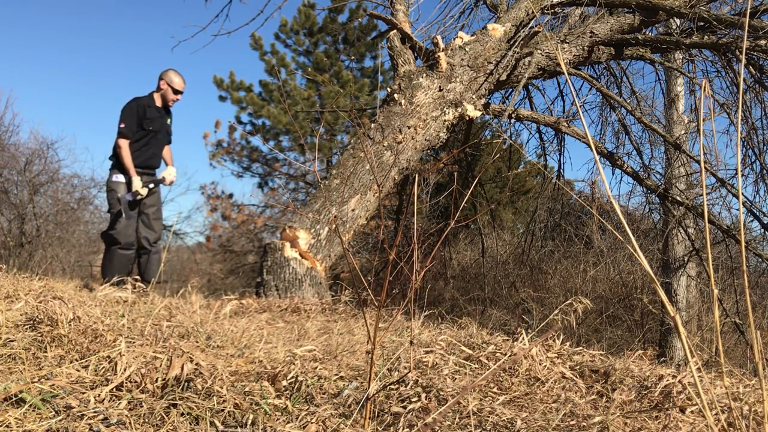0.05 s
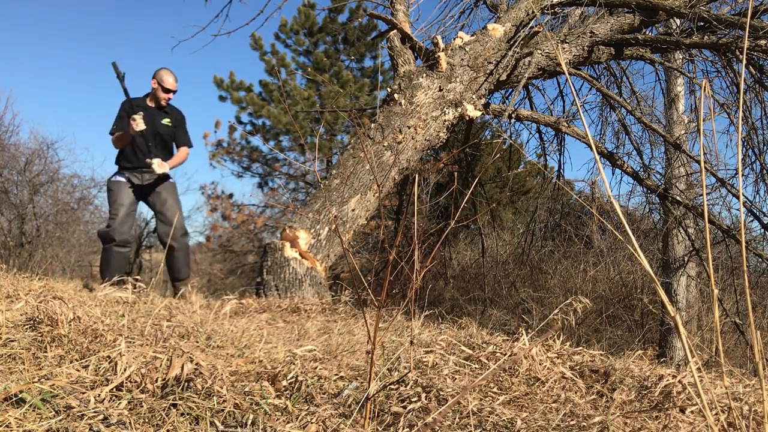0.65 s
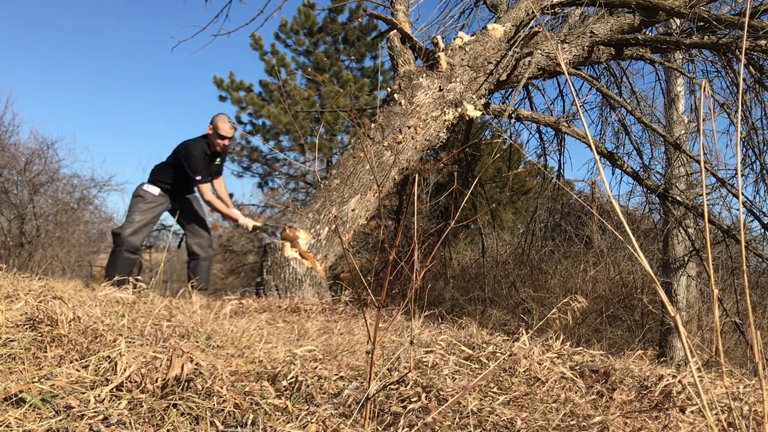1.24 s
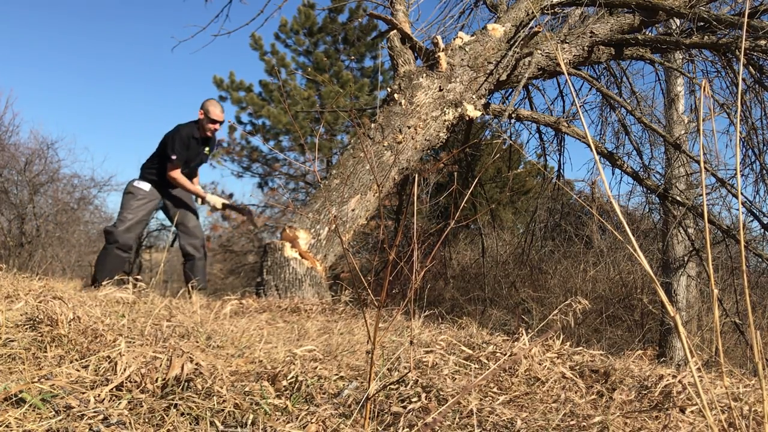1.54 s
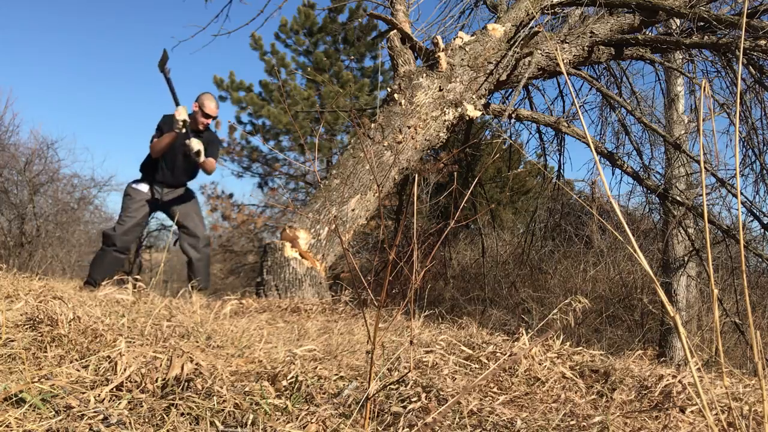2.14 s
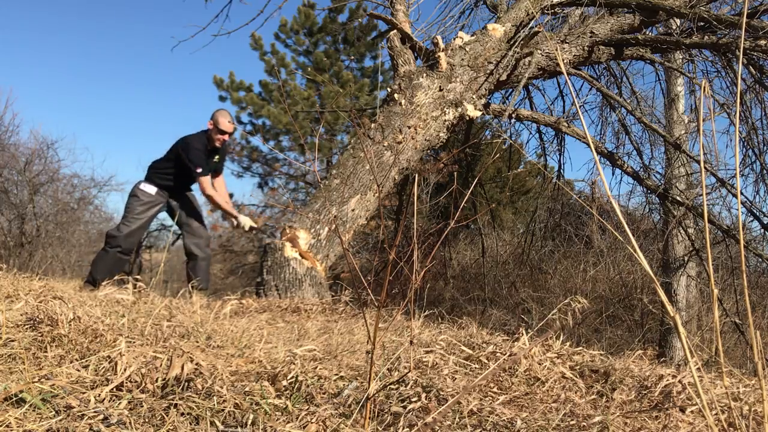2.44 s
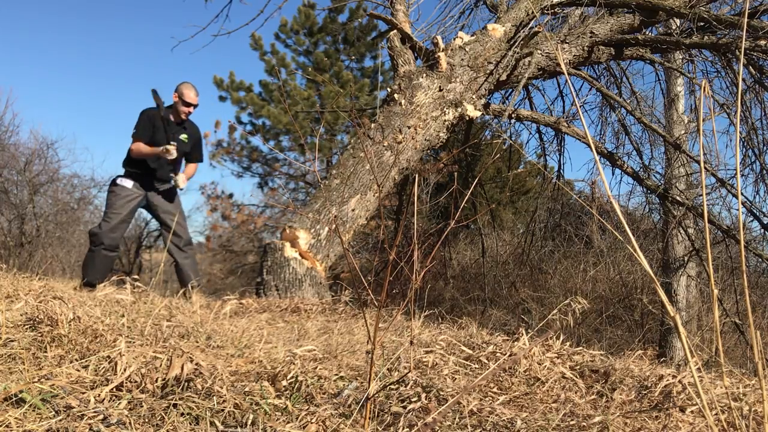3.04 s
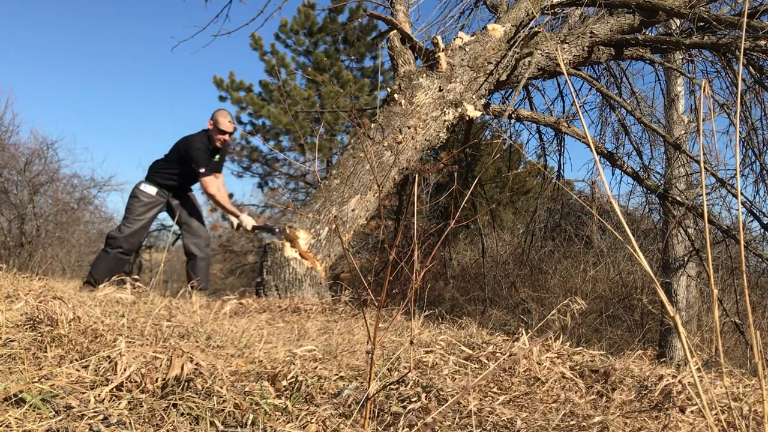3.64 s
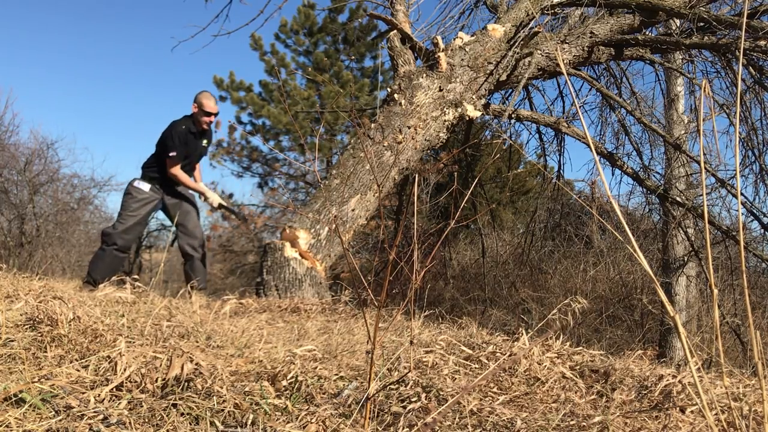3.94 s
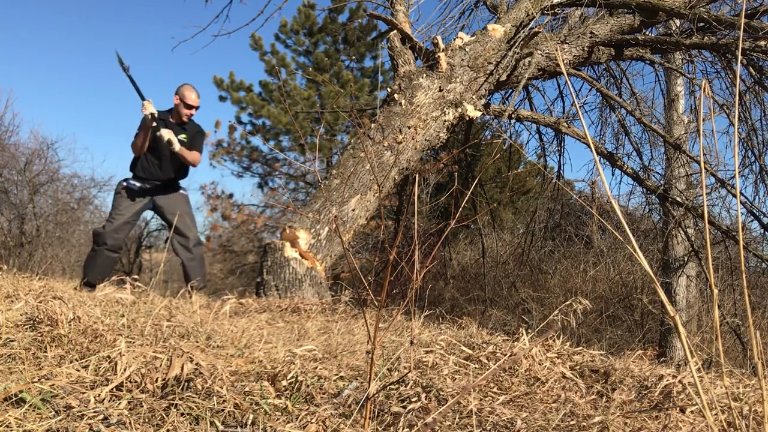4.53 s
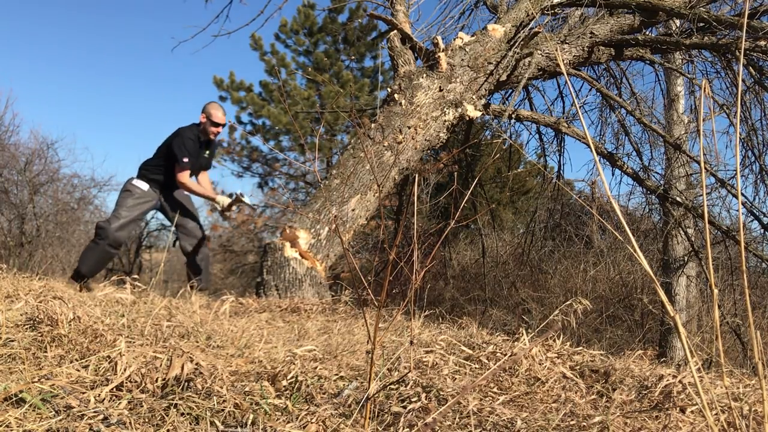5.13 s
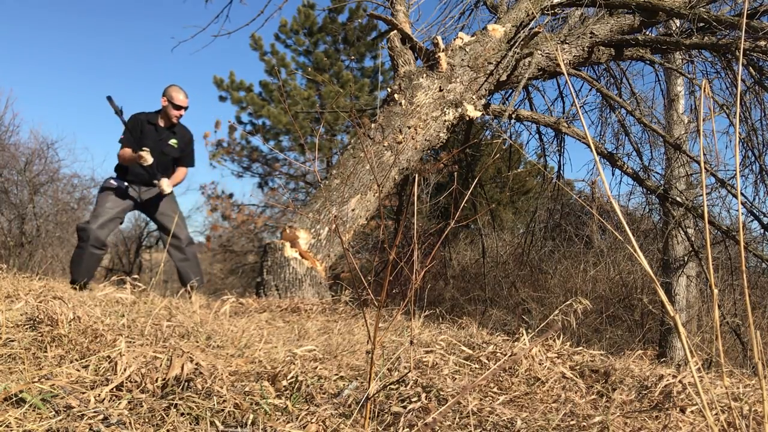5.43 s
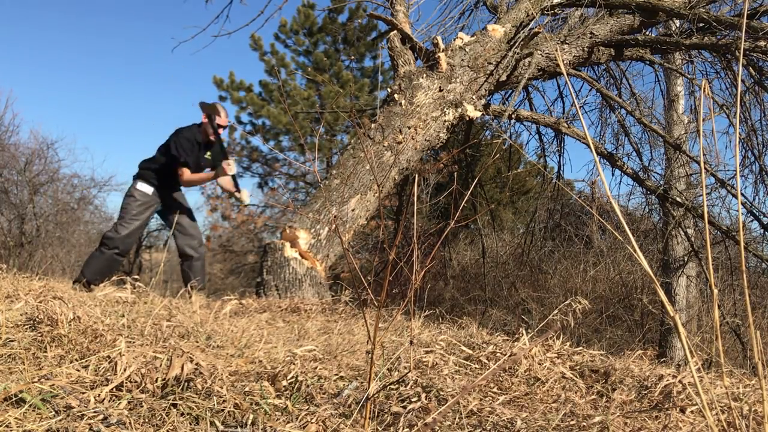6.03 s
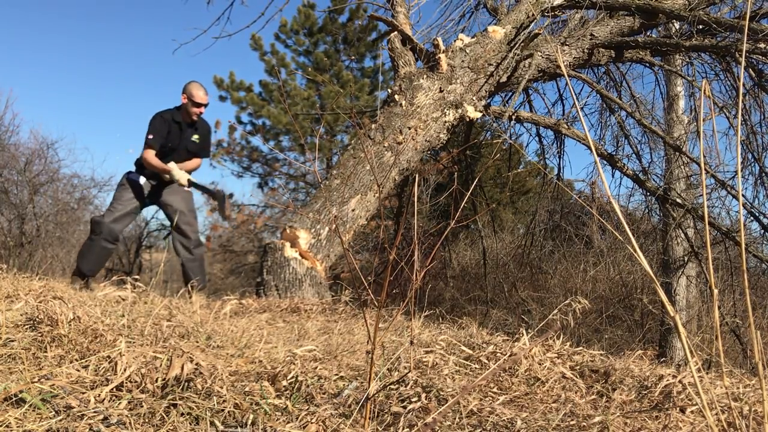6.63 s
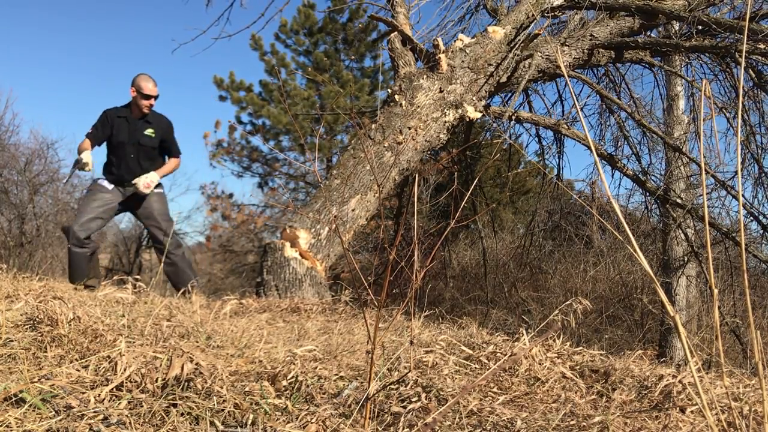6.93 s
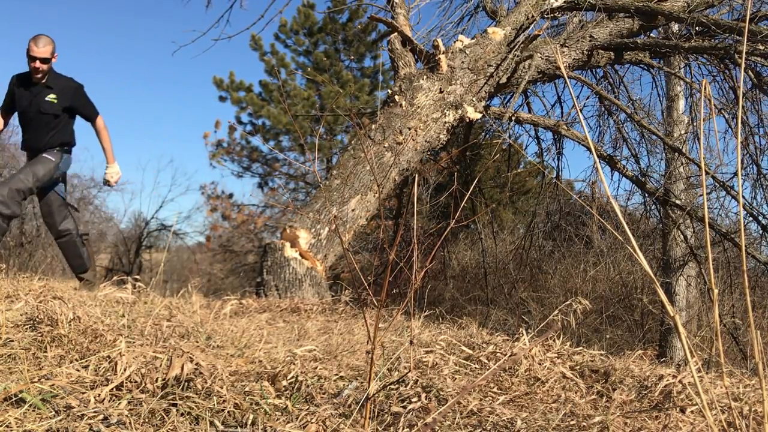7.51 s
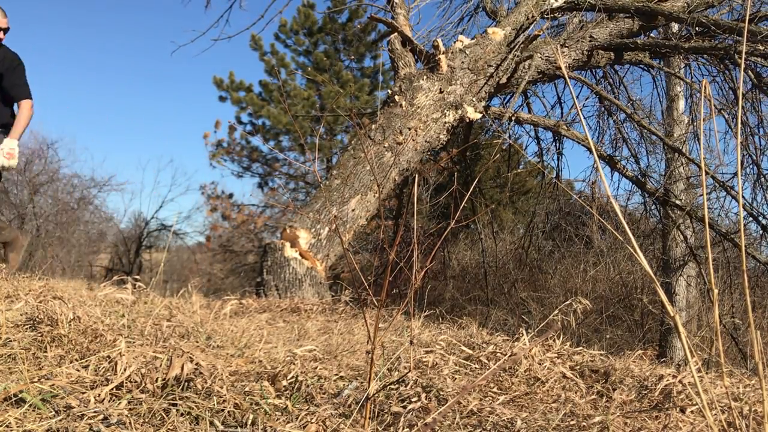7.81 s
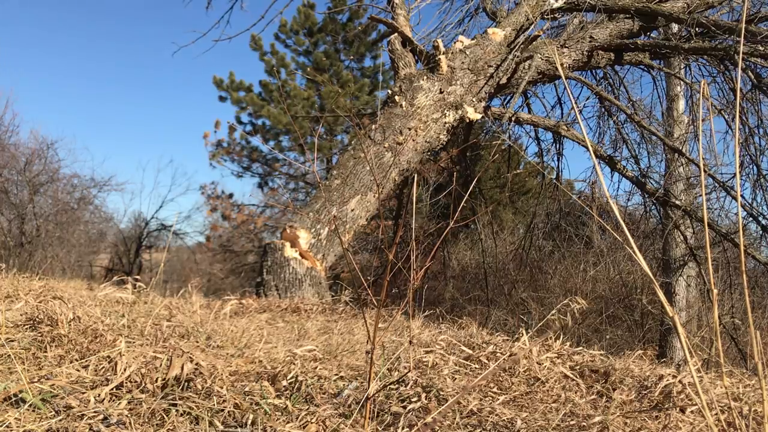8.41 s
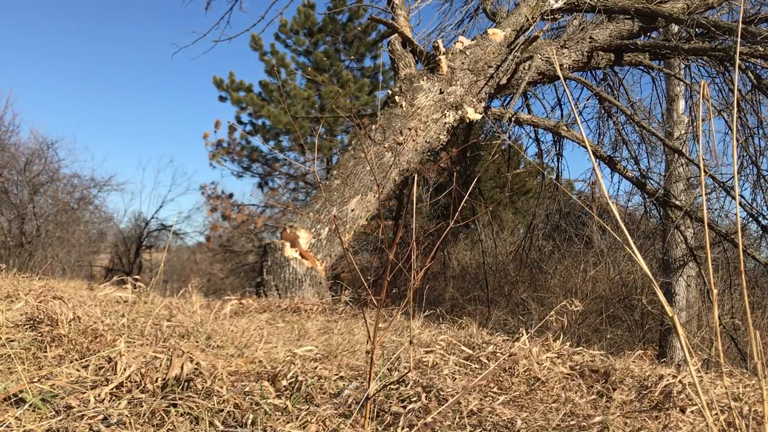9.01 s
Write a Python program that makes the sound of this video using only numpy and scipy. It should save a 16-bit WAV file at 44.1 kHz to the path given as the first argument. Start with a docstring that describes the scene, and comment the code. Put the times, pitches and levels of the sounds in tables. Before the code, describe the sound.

At the edge of a quiet field, an axe chops into a tree five times, a little over a second apart. Each blow is a sharp crack over a woody knock, with a short echo from nearby trees. Wood fibres snap between the later blows. Then much softer footsteps move through dry grass, breaking twigs. Faint, distant traffic rumbles underneath.

```python
"""At the edge of a dry field, an axe bites five times into the base of a leaning tree.
Each blow is a short crack of tearing fibres over the knock and thud of the trunk, thrown back by the
wood behind; strained fibres snap at the cut. Then the chopper walks off through dead grass, boots
puffing on the turf and breaking twigs. Far traffic rumbles underneath, and a faint bird calls once."""
import sys
import numpy as np
from scipy import signal
from scipy.io import wavfile
from scipy.ndimage import uniform_filter1d

SR = 44100
rng = np.random.default_rng(int(sys.argv[2]) if len(sys.argv) > 2 else 0)


def wrap_up_sound(samples):
    """Save the sound to the file named by the first command line argument, as 16-bit audio."""
    columns = np.atleast_2d(samples).T
    # keep every value between -1 and 1, then stretch to whole-number steps
    tamed = np.clip(columns, -1, 1)
    steps = np.round(tamed * 32767).astype(np.int16)
    wavfile.write(sys.argv[1], SR, steps)


N = 408366


def amp(db):
    return 10 ** (np.asarray(db) / 20)


def unit(x):
    """Scales to rms 1."""
    return x / np.sqrt(np.mean(x ** 2) + 1e-20)


def burst(x, db):
    """Gives a transient the energy of 5 ms at this level."""
    return x * amp(db) * np.sqrt(.005 * SR / np.sum(x ** 2))


def curve_at(points, hz):
    """Reads a breakpoint curve on a log-frequency axis."""
    f, value = np.transpose(points)
    return np.interp(np.log(hz + 1), np.log(f), value)


def add(mix, s, sound):
    """Lays a sound into the mix at s seconds."""
    part = mix[round(s * SR):][:len(sound)]
    part += sound[:len(part)]


def eq(x, points, size=4096):
    """Minimum-phase EQ through breakpoints of f/Hz, level/dB."""
    log_gain = np.log(amp(curve_at(points, abs(np.fft.fftfreq(size, 1 / SR)))))
    taps = np.fft.ifft(np.exp(np.conj(signal.hilbert(log_gain)))).real
    return signal.fftconvolve(x, taps[:size // 2])[:len(x)]


# fader ride on the far traffic: t/s, level/dB
TRAFFIC_FADER = [(0, -59.5), (1.4, -56), (3.1, -59), (7.9, -57.5), (8.4, -56), (9.26, -55)]
# tone of the traffic rumble and of the open air: f/Hz, level/dB
TRAFFIC_EQ = [(20, -38), (36, -18), (52, 3), (72, -5), (100, -3.5), (160, -10.5), (250, -17.5), (400, -27),
              (750, -34.5), (3000, -69.5)]
AIR_EQ = [(100, -5), (400, -3.5), (750, -3.5), (1200, 0.5), (1900, -4), (3200, -10.5), (7000, -15.5),
          (16000, -20)]
def traffic_and_air():
    """The bed: far traffic rumbles, gently swelling and easing, under a steady wash of air."""
    fader = amp(np.interp(np.arange(N) / SR, *np.transpose(TRAFFIC_FADER)))
    rumble = fader * unit(eq(rng.standard_normal(N), TRAFFIC_EQ, size=16384))
    return rumble + amp(-71) * unit(eq(rng.standard_normal(N), AIR_EQ))


def stalks(per_s, spread_db):
    """Dry stalks tick at random on a spread of pitches, each ringing for a few cycles."""
    out, t = np.zeros(N), np.arange(256) / SR
    pitches = np.linspace(1800, 15500, num=22)
    for hz in pitches:
        at = np.flatnonzero(rng.random(N) < per_s / len(pitches) / SR)
        clicks = np.zeros(N)
        clicks[at] = rng.choice([-1., 1.], len(at))
        clicks[at] *= amp(spread_db * np.minimum(rng.exponential(1, len(at)), 4.5))
        out += signal.oaconvolve(clicks, np.sin(2 * np.pi * hz * t) * np.exp(-t / .0003))[:N]
    return unit(out)


def blade_flicks(per_s, spread_db):
    """Lone blades flick: tiny broadband clicks with a few ms of flutter."""
    t = np.arange(SR // 50) / SR
    flicks = (rng.random(N) < per_s / SR) * amp(spread_db * rng.standard_normal(N))
    return signal.oaconvolve(flicks, np.exp(-t / .0025))[:N] * rng.standard_normal(N)


# leg swishes through the grass: peak t/s, 10 dB rise/s, 10 dB fall/s, level/dB, stems re swish/dB
SWISHES = [(.67, .13, 0.29, -67, -16), (.90, 0.16, 0.071, -60.5, -17), (1.14, 0.063, 0.097, -68, -14),
           (1.255, 0.13, 0.1, -60, -20.5), (1.64, 0.046, 0.051, -60, -18), (1.779, 0.13, 0.52, -67.5, -6),
           (2.12, .05, .1, -77, -14), (2.91, 0.085, 0.21, -71, -8), (3.22, 0.11, .12, -74.5, -14),
           (4.29, 0.083, 0.098, -73, -14), (5.01, 0.096, .06, -69, -12.5), (5.335, .1, 0.057, -53.5, -19),
           (6.701, 0.3, .15, -61, -12), (6.95, 0.13, 0.13, -56, -9), (7.242, .15, 0.15, -54.5, -12),
           (7.38, 0.1, 0.053, -63.5, 4), (7.715, 0.05, 0.054, -49.5, -9), (7.865, 0.064, 0.061, -52, -11),
           (7.999, 0.026, 0.085, -59, -6), (8.272, .015, 0.13, -51.5, -27),
           (8.56, 0.059, 0.066, -60.5, -18), (8.99, 0.093, 0.1, -53, -26), (8.925, 0.022, 0.08, -64, -20.5),
           (9.08, .03, .04, -61.5, -9.5), (9.23, 0.07, .1, -68, -7.5)]
# tone of dry blades, stiff stems and crunching turf: f/Hz, level/dB
GRASS_EQ = [(300, -12), (900, -3), (2000, -6.5), (3800, 0), (6000, 0.5), (9000, -0.5), (11000, -2.5),
            (13500, 0.5), (16000, -6.5)]
STEM_EQ = [(1500, -21.5), (3000, 1), (4200, 1.5), (7000, -7.5), (10000, -10.5), (16000, -21.5)]
TURF_EQ = [(40, -5.5), (90, 3), (280, 3.5), (600, -6.5), (1200, -15.5), (3000, -25)]
def grass(walk_s=6.6, idle_db=-83.5, litter_db=-67.5):
    """Legs brush blades and crackle stems, turf crunches on the walk, litter sifts after each blow."""
    t = np.arange(N) / SR
    clumps = amp(.9 * unit(uniform_filter1d(rng.standard_normal(N), size=600)))
    swish_power, stem_power = np.zeros(N), np.zeros(N)
    for s, rise_s, fall_s, db, stems_db in SWISHES:
        power = amp(db - 10 * np.maximum((s - t) / rise_s, (t - s) / fall_s)) ** 2
        swish_power += power
        stem_power += power * amp(stems_db) ** 2
    litter = sum(np.interp(t - s, [0, .05, .396, .456], [0, 1, 1, 0]) for s, *_ in AXE_HITS)
    stir = np.sqrt(swish_power + amp(idle_db) ** 2 + (amp(litter_db) * litter) ** 2)
    walking = np.clip((t - walk_s) / .3, 0, 1)
    grit = .5 + .3 * walking  # balance of stalk ticks to smooth hiss
    rustle = (grit * stalks(per_s=1800, spread_db=4.1) + rng.standard_normal(N)) / np.hypot(grit, 1)
    blades = stir * unit(eq(rustle * clumps, GRASS_EQ))
    flicks = unit(eq(blade_flicks(per_s=19, spread_db=3), GRASS_EQ))
    flicks *= amp(-83 + 8.7 * walking) * (t > .5)
    stems = np.sqrt(stem_power) * unit(eq(stalks(per_s=1400, spread_db=3.6), STEM_EQ))
    turf = unit(eq(rng.standard_normal(N) * clumps, TURF_EQ))
    turf *= walking * (amp(-76) + amp(-10) * stir)
    return blades + flicks + stems + turf


# tone of tearing wood: f/Hz, level/dB
TEAR_EQ = [(150, -27.5), (500, -16.5), (1000, -12.5), (1400, -8.5), (1800, -4.5), (2300, -5), (2800, -1.5),
           (3500, -1), (4700, -8), (6000, -6), (7800, -12), (10500, -17.5), (13000, -18), (16000, -24)]
def tear(t, bite_ms, mid_db, top_db, fall_s, scatter_db, scatter_s):
    """Fibres part in a dense volley while the bite lasts; bark and ground scatter a short tail."""
    bite_s = bite_ms / 1000
    after = np.maximum(t - bite_s, 0)
    attack = np.minimum(.31 + t / bite_s, 1)
    release = np.exp(-after / fall_s) + amp(scatter_db) * np.exp(-after / scatter_s)
    volley = attack * release * rng.choice([-1., 1.], len(t))
    tilt = [(1500, mid_db), (2800, 0), (3800, 0), (7500, top_db)]
    return eq(volley, [(hz, db + curve_at(tilt, hz)) for hz, db in TEAR_EQ])


# twigs underfoot: t/s, level/dB, mids/dB, top/dB
TWIG_BREAKS = [(0.8763, -53, 17, 12.5), (3.963, -56.5, -3, 19), (4.4948, -59.5, -1.5, 14.5),
               (6.7165, -49.5, 2, 8.5), (6.7706, -46.5, -2, 10.5), (6.8308, -47, -13, 4.5),
               (6.932, -44.5, 18, 14.5), (6.9908, -48.5, -9, 21.5), (7.0902, -40.5, 0.5, 9),
               (7.115, -42, -4, 3), (7.2461, -44.5, -3, 3), (7.582, -56, -11, 11), (7.625, -54, -14, 9),
               (7.711, -38.5, -0.5, 12.5), (7.8247, -52.5, -6, 1), (7.9947, -53.5, -10, -8),
               (8.1954, -52, 7, 5), (8.8998, -54, -8, 22), (9.172, -60, -3, 3)]
def twigs(bite_ms=2.02):
    """Thin dry sticks break with a short tear and no knock."""
    out, t = np.zeros(N), np.arange(SR // 6) / SR
    for s, db, mid_db, top_db in TWIG_BREAKS:
        crack = tear(t, bite_ms, mid_db, top_db, fall_s=.0005, scatter_db=-9, scatter_s=.012)
        add(out, s, burst(crack, db))
    return out


# axe hits: t/s, crack level/dB, bite/ms, mids/dB, top/dB, cut f/Hz, cut ring/dB, buzz/dB,
# splinter f/Hz, splinter ring/dB, knock/dB, trunk tuning/ratio, bark/dB, thud/dB,
# slab f/Hz, slab ring/dB; rings and buzz are relative to the crack
AXE_HITS = [(1.3390, -11.5, 2.9, -1.5, -7, 2830, -6.5, -31, 1865, -14, 0.5, 0.94, -27.5, 0.5, 1230, -20),
            (2.5344, -13.5, 3.0, -2.5, 6, 3730, -11.5, -36.5, 5480, -6.5, -9, .75, -30.5, -2.5, 1957, -10.5),
            (3.7522, -14, 3.46, 7, 0.5, 3326, -11, -29, 4190, -8, 1.5, 1.08, -28.5, -0.5, 1600, -9),
            (5.0428, -17.5, 2.4, 3.5, -1.5, 3280, -7, -22, 6100, -9.5, 2, 1.05, -32.5, 0, 1643, -10.5),
            (6.2560, -13.5, 4.15, -2, 0.5, 2678, -7, -33, 3403, -7.5, -1, 0.9, -23, -11, 950, -17)]
# modes of the trunk's knock and the roots' thud, before tuning: f/Hz, level/dB, T60/s
TRUNK_MODES = [(174, -26.5, 0.066), (245, -25.5, 0.052), (370.1, -24, .055), (425, -22.5, 0.053),
               (566, -21, .022), (836, -47, 0.13), (1050, -30.5, .02)]
ROOT_MODES = [(56, -42, 0.26), (90.45, -25.5, .14), (118, -33, .09)]
# tone of loose bark rattling: f/Hz, level/dB
BARK_EQ = [(25, -35), (60, -15.5), (130, -1.5), (230, -2), (400, -7), (600, -12), (1000, -12.5),
           (2000, -27), (6000, -50.5)]
def axe():
    """Each blow tears the cut, rings splinter and slab, knocks the trunk and shakes bark and roots."""
    out, t = np.zeros(N), np.arange(SR // 3) / SR
    tremble_filter = signal.butter(2, 170, fs=SR, output="sos")
    for (s, db, bite_ms, mid_db, top_db, cut_hz, cut_db, buzz_db, splinter_hz, splinter_db,
         knock_db, tuning, bark_db, thud_db, slab_hz, slab_db) in AXE_HITS:
        crack = tear(t, bite_ms, mid_db, top_db, fall_s=.0008, scatter_db=-16, scatter_s=.012)
        add(out, s, burst(crack, db))
        strain = np.minimum(t * 1000 / bite_ms, 1) ** 2
        rings = [(cut_hz, cut_db, .0019), (splinter_hz, splinter_db, .0014), (slab_hz, slab_db, .0012)]
        for hz, ring_db, decay_s in rings:
            ping = np.sin(2 * np.pi * hz * t) * strain * np.exp(-t / decay_s)
            add(out, s, burst(ping, db + ring_db))
        tremble = signal.sosfilt(tremble_filter, rng.standard_normal(len(t)))  # loose fibres
        buzz = np.sin(2 * np.pi * cut_hz * t) * strain * tremble * np.exp(-t / .055)
        add(out, s, burst(buzz, db + buzz_db))
        wedge = tear(t, 2.7, mid_db, top_db, fall_s=.00062, scatter_db=-22, scatter_s=.0054)
        add(out, s + .0052, burst(wedge, db - 11))  # the head jams in the cut
        add(out, s + .0011, amp(knock_db) * ring(TRUNK_MODES, t, tuning, rise_cycles=.36))
        bark = eq(rng.standard_normal(len(t)) * np.exp(-t / .018), BARK_EQ)
        add(out, s + .004, burst(bark, bark_db))
        add(out, s + .003, amp(thud_db) * ring(ROOT_MODES, t, tuning=.97, rise_cycles=.65))
    return out


def ring(modes, t, tuning, rise_cycles):
    """The tree's body: bending waves are slow in the bass, so low modes bloom later."""
    out = np.zeros(len(t))
    for k, (hz, db, t60) in enumerate(modes):
        envelope = (1 - np.exp(-t * hz / rise_cycles)) * amp(db - 60 * t / t60)
        out += (-1) ** k * envelope * np.sin(2 * np.pi * hz * tuning * t)
    return out


# tone of the reverb from the trees: f/Hz, level/dB
REVERB_EQ = [(60, 4), (150, 4), (300, 2.5), (600, -1.5), (1400, 2), (2400, -2.5), (4200, -6.5),
             (9000, -6.5), (16000, -7)]
# its decay: f/Hz, T60/s
REVERB_T60 = [(100, 0.68), (400, 0.79), (1500, 0.99), (3000, 1), (7000, 0.73), (15000, .45)]
def tree_echoes(x, wet_db, echo_s, echo_db, field_db, slap_s, slap_db):
    """The field returns little; the first stand of trees echoes, those behind scatter a diffuse tail."""
    frames = dict(fs=SR, nperseg=256, noverlap=192)
    hz, frame_s, spectrum = signal.stft(x, **frames)
    power = uniform_filter1d(uniform_filter1d(abs(spectrum) ** 2, size=5, axis=0), size=5, axis=0)
    t = frame_s[frame_s < 1]
    arrivals = np.interp(t, [.012, .02, .068, .076], [0, amp(field_db), amp(field_db), 1])
    arrivals += amp(echo_db) * np.exp(-((t - echo_s) / .006) ** 2)
    decay = amp(curve_at(REVERB_EQ, hz)[:, None] - 60 * t / curve_at(REVERB_T60, hz)[:, None])
    response = (arrivals * decay) ** 2 / len(t)
    envelope = np.sqrt(abs(signal.fftconvolve(power, response, axes=1)[:, :len(frame_s)]))
    # the trees stand in uneven groups, so the tail comes back in patches
    drift = uniform_filter1d(rng.standard_normal(spectrum.shape), size=5, axis=1)
    patches = amp(1.7 * unit(uniform_filter1d(drift, size=24, axis=0)))
    scatter = signal.stft(rng.standard_normal(N), **frames)[2]
    out = amp(wet_db) * signal.istft(envelope * patches * scatter / scatter.std(), **frames)[1][:N]
    add(out, slap_s, amp(slap_db) * x)  # slapback off the nearest big trunk
    return out


# one far call: t/s, length/s, start f/Hz, end f/Hz, level/dB
BIRD_CALL = (1.65, .22, 1850, 1960, -68.5)
def bird():
    """A faint, wavering whistle that slides slightly upward."""
    s, length_s, start_hz, end_hz, db = BIRD_CALL
    out, n = np.zeros(N), int(length_s * SR)
    waver = unit(uniform_filter1d(rng.standard_normal(n), size=60))
    hz = np.linspace(start_hz, end_hz, n) * (1 + .07 * waver)
    whistle = np.sin(2 * np.pi * np.cumsum(hz) / SR)
    add(out, s, amp(db) * unit(whistle * signal.windows.tukey(n, .7)))
    return out


# snaps at the cut: t/s, level/dB, bite/ms, mids/dB, top/dB, knock trim/dB
FIBRE_SNAPS = [(2.528, -43, 2.6, -5.5, 4.5, -25), (2.5811, -41, 3.1, 13.5, -3, 9),
               (3.7847, -30.5, 2.4, -5.5, 17.5, -10.5), (3.793, -34, .54, -9.5, 16.5, -16.5),
               (3.880, -49, 6.4, 9, 6, -1), (4.798, -30.5, 3.2, -3, 3.5, -12.5),
               (5.7101, -34, 1.7, 8.5, -1, -3), (6.2964, -48.5, 3, 0, -3, 15.5),
               (6.4432, -42.5, 1.5, -10, 13, -9), (6.457, -20, 1.12, -1.5, 4, -8),
               (6.602, -35, 4.6, -8.5, 5, -15)]
def fibre_snaps():
    """Strained fibres and chips let go, each with a little of the trunk's knock."""
    out, t = np.zeros(N), np.arange(SR // 6) / SR
    for s, db, bite_ms, mid_db, top_db, trim_db in FIBRE_SNAPS:
        crack = tear(t, bite_ms, mid_db, top_db, fall_s=.00069, scatter_db=-13, scatter_s=.011)
        knock = ring(TRUNK_MODES, t, tuning=rng.uniform(.94, .96), rise_cycles=.3)
        add(out, s, burst(crack, db))
        add(out, s + .0019, burst(knock, db - 8.5 + trim_db))
    return out


# boots on soft ground: t/s, level/dB, f/Hz
FOOTFALLS = [(6.931, -50.5, 300), (7.3972, -51.5, 307), (7.4786, -55, 540), (7.7508, -47, 366),
             (7.912, -51.5, 450), (8.0559, -46.5, 365), (8.2583, -40, 190), (8.815, -50.5, 129.7)]
def footsteps():
    """Each heel presses a dull puff out of the turf."""
    out, t = np.zeros(N), np.arange(SR // 6) / SR
    for s, db, hz in FOOTFALLS:
        puff = rng.standard_normal(len(t)) * t * np.exp(-t / .0043)
        tone = [(hz / 4, -14), (hz, 0), (hz * 2, -14), (hz * 6, -30), (hz * 20, -50)]
        add(out, s, burst(eq(puff, tone), db))
    return out


def scene():
    """Mono mix; only the axe, snaps and twigs feed the echoes."""
    wood = axe() + fibre_snaps() + twigs()
    echoes = tree_echoes(wood, wet_db=-11.5, echo_s=.0755, echo_db=-2, field_db=-6.5,
                         slap_s=.0745, slap_db=-36.5)
    return (wood + echoes + footsteps() + grass() + traffic_and_air() + bird())[None]


def record(dry):
    """The recorder's limiter rounds off the highest peaks; a steep high cut trims the very top."""
    ceiling, high_cut_hz = .72, 16300
    rounded = dry / (1 + (dry / ceiling) ** 6) ** (1 / 6)
    high_cut = signal.firwin(255, high_cut_hz, window=("kaiser", 9), fs=SR)
    return signal.oaconvolve(rounded, high_cut[None], "same")


dry = scene()
out = record(dry)
wrap_up_sound(out)
```